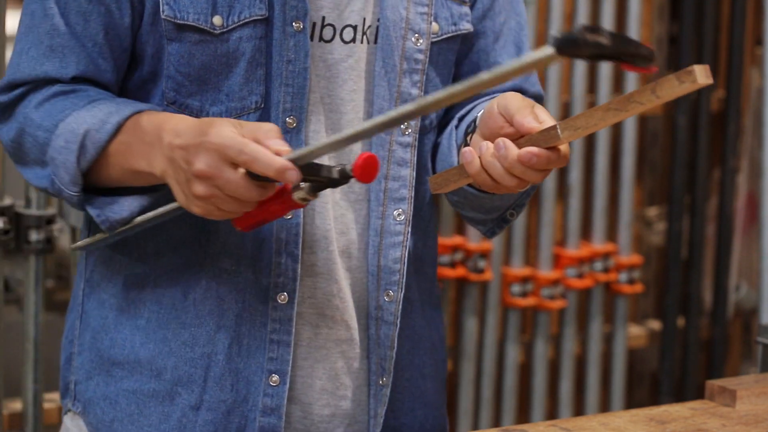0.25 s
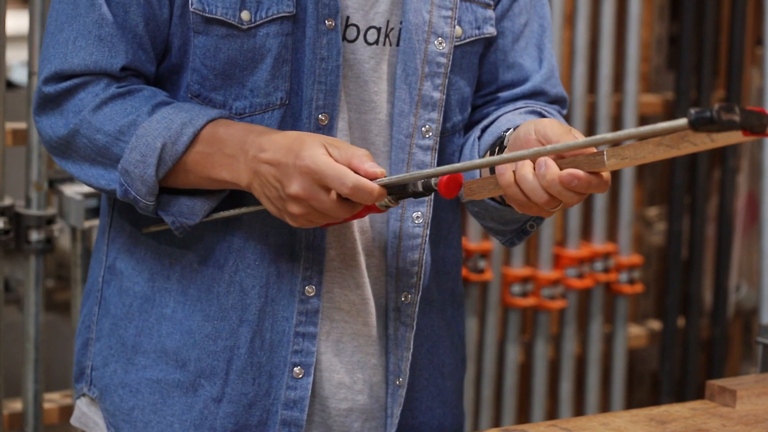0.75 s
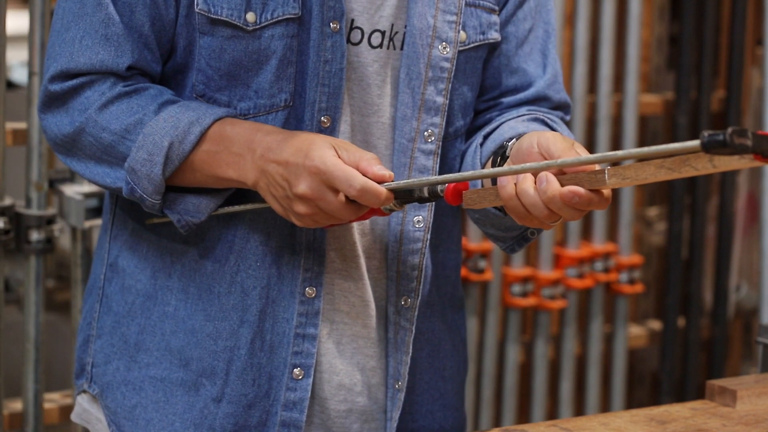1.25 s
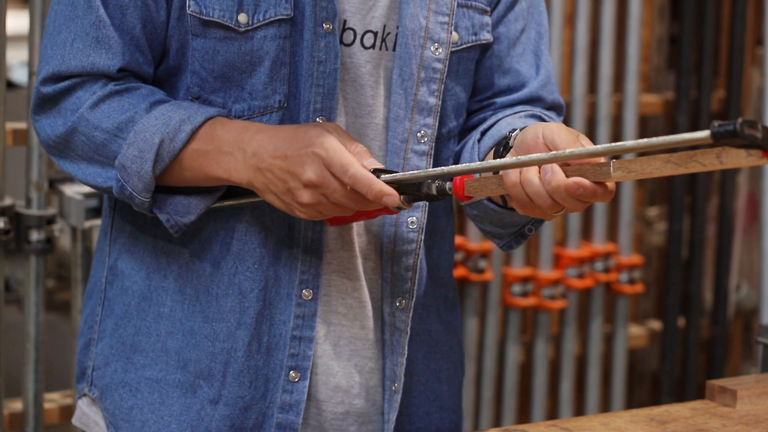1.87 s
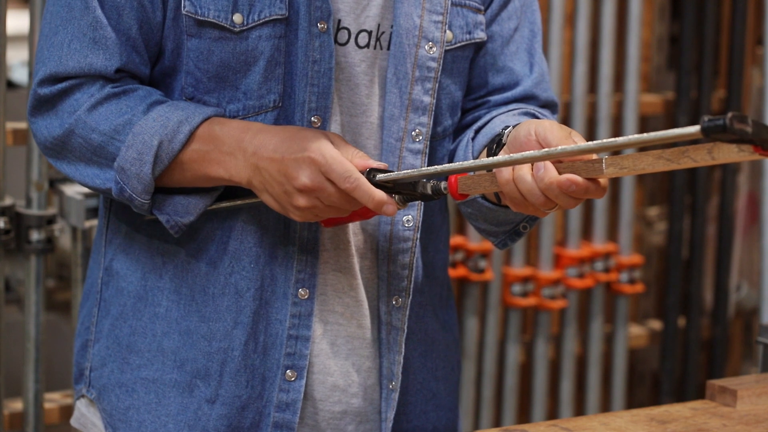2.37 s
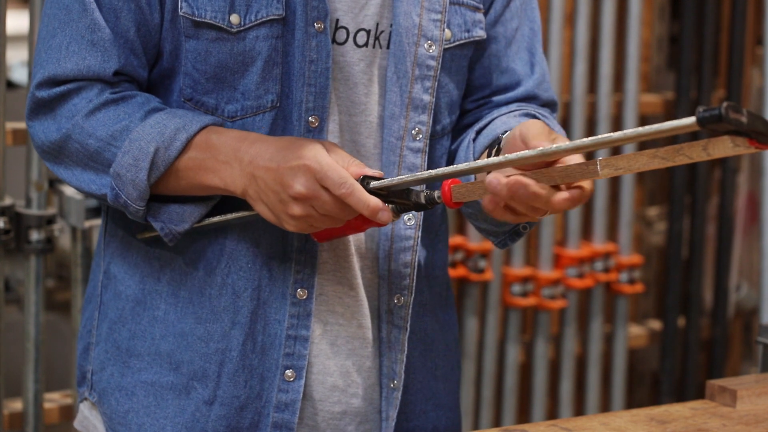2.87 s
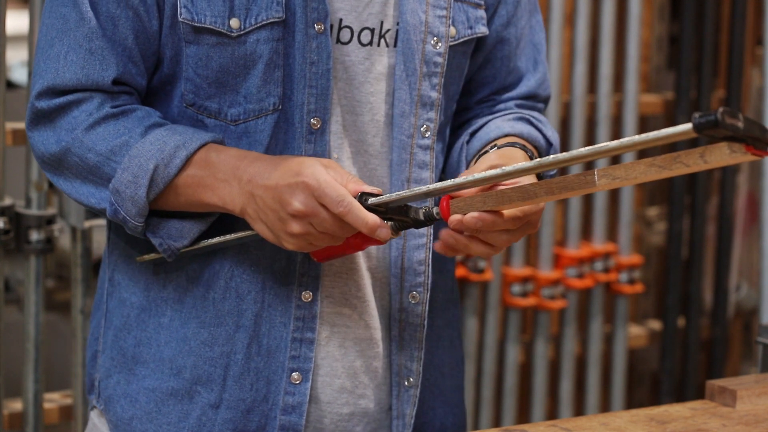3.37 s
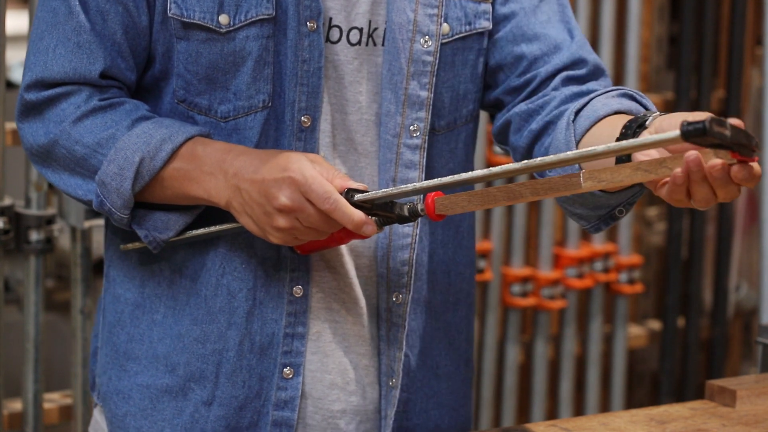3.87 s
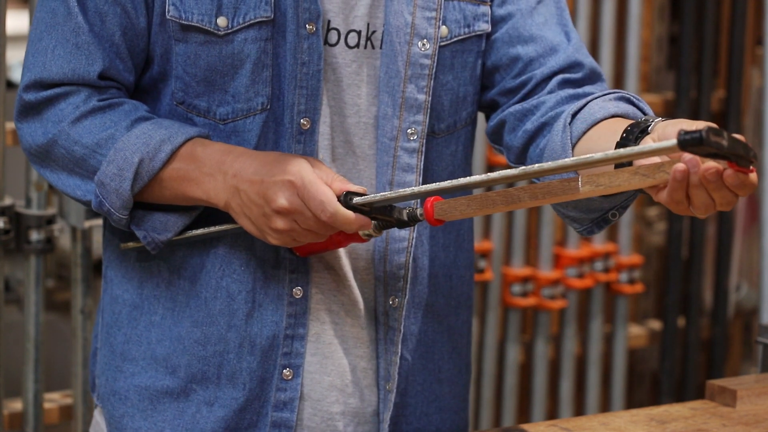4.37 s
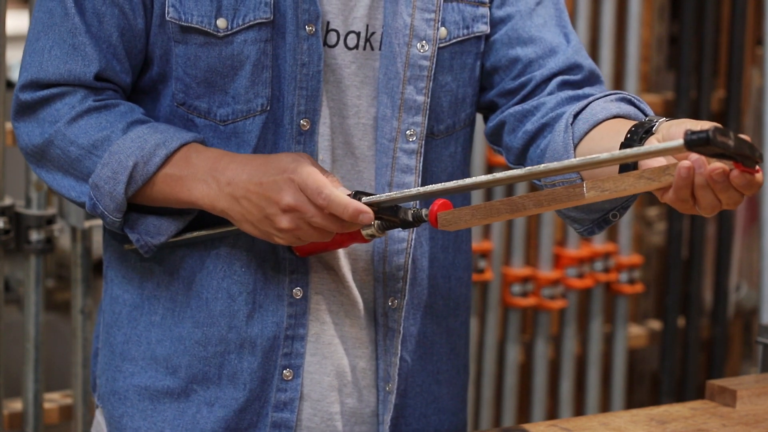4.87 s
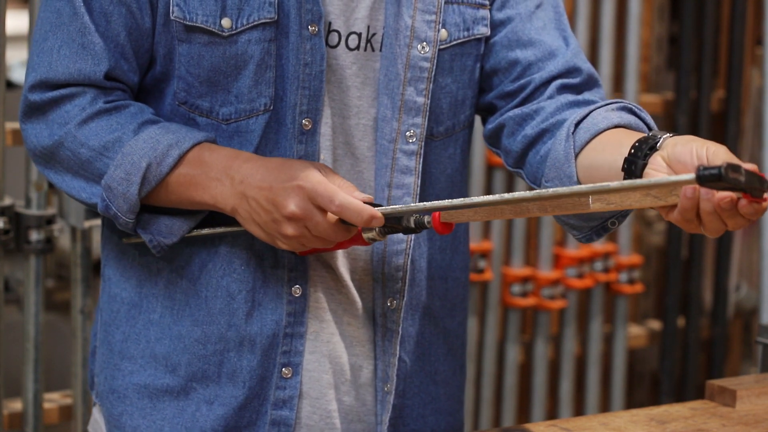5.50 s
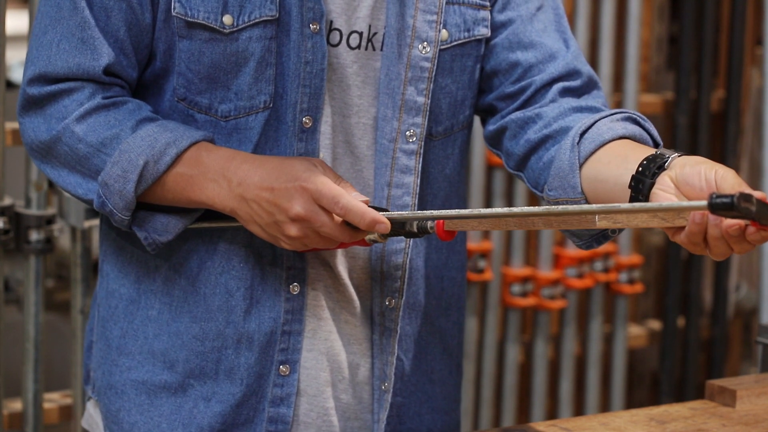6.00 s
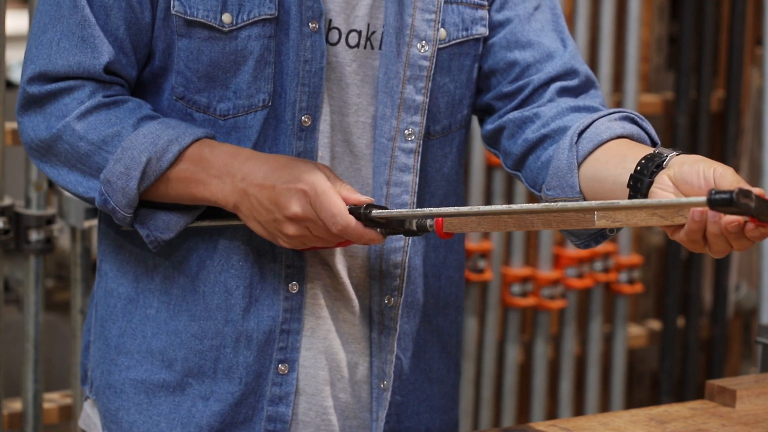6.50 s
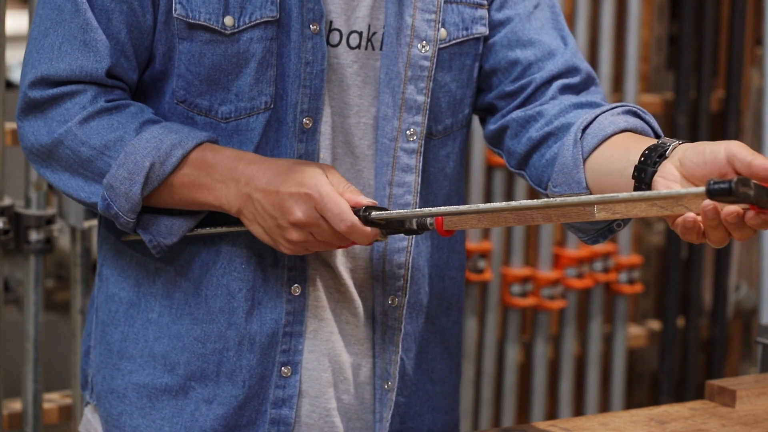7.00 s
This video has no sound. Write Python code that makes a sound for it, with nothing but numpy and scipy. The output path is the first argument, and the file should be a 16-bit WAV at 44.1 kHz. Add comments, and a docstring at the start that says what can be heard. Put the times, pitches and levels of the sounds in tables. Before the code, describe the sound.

Close metallic clicks and rattles of a steel bar clamp on wood, then farther, sharp echoing thuds at about four a second, like an air stapler.

```python
"""Bar clamp and air stapler in a workshop

A steel bar clamp is fitted to a strip of wood close by: contact noise clicks and taps, and decaying modes ring the bar.
Then sharp thuds, about four a second, come from further off, most likely an air stapler: echoes, bench modes and
filtered noise form each blow, and a noise puff its exhaust. Scrapes of work shifted on a bench are room-smeared noise.
A motor hums faintly underneath as wavering sines, over filtered noise for the still air and its hiss."""
import sys
import numpy as np
from scipy import signal
from scipy.fft import rfft, irfft, next_fast_len
from scipy.io import wavfile
from scipy.ndimage import uniform_filter1d, map_coordinates

SR = 44100
rng = np.random.default_rng(int(sys.argv[2]) if len(sys.argv) > 2 else 0)


def unload_audio(sound):
    """Save the sound as a 16-bit wav file, at the path given as the first command line argument."""
    columns = np.transpose(np.atleast_2d(sound))
    # keep every value between -1 and 1, then stretch to whole-number steps
    steps = np.round(np.clip(columns, -1, 1) * 32767)
    wavfile.write(sys.argv[1], SR, steps.astype(np.int16))


N = 319725

# spectrum of the escaping air: (frequency [Hz], relative level [dB])
EXHAUST_SPECTRUM = [(40, -56), (250, -20.5), (700, 4.5), (1500, -0.5), (2500, -1), (3600, 0.5), (4400, -3),
                    (5900, -1.5), (7200, -6.5), (9000, -9.5), (12500, -17.5), (15500, -26.5)]
# reverberation of the workshop: (frequency [Hz], time to decay by 60 dB [s])
ROOM_DECAY = [(100, 0.74), (300, 1), (700, 0.66), (1400, .74), (3000, 0.68), (5500, 0.56), (8000, 0.39),
              (11000, 0.35), (16000, 0.29)]


def amp(db):
    """Level to amplitude: 20 dB is a factor of ten."""
    return 10 ** (np.asarray(db) / 20)


def unit(x):
    """Normalisation to a root-mean-square value of one."""
    return x / np.sqrt(np.mean(x ** 2) + 1e-20)


def along(points, hz):
    """Linear interpolation of (frequency [Hz], value) points on a logarithmic frequency axis."""
    point_hz, value = np.transpose(points)
    return np.interp(np.log(hz + 1), np.log(point_hz + 1), value)


def bell(hz, centre_hz, slope_db):
    """Resonance-like weighting in dB: a hump falling with the square of the distance in octaves."""
    octaves = np.log2((hz + 100) / (centre_hz + 100))
    return -slope_db * octaves ** 2


def wobble(rate):
    """Band-limited random modulation: a smooth curve through normal random knots, rate of them a second."""
    knots = rng.standard_normal(int(N * rate / SR) + 4)
    return map_coordinates(knots, [np.arange(N) * rate / SR])


def filtered(x, response):
    """Linear filtering as a product of the spectrum with a zero-phase response(Hz)."""
    size = next_fast_len(N + SR // 2)
    spectrum = rfft(x, size) * response(np.fft.rfftfreq(size, 1 / SR))
    return irfft(spectrum, size)[..., :N]


def pulse(level, size=4096):
    """Minimum phase from a folded cepstrum: the causal pulse of energy 1 shaped by level(Hz) in dB."""
    cepstrum = irfft(np.log(amp(level(np.fft.rfftfreq(size, 1 / SR))) + 1e-6))
    cepstrum[1:size // 2] *= 2
    cepstrum[size // 2 + 1:] = 0
    shape = irfft(np.exp(rfft(cepstrum)))
    return shape / np.linalg.norm(shape)


def coloured(x, spectrum):
    """Convolution with a causal filter given as (frequency [Hz], relative level [dB]) points."""
    return signal.fftconvolve(x, pulse(lambda hz: along(spectrum, hz)))[:len(x)]


def add(track, s, sound):
    """Superposition: a sound is summed into the track from time s [s] on, cut at the track's ends."""
    start = round(s * SR)
    sound = sound[max(-start, 0):max(N - start, 0)]
    track[max(start, 0):][:len(sound)] += sound


def room(early_db, early_s):
    """Reverberation as decaying noise of energy 1: each band has its own decay, early sound is boosted."""
    hz, t, bands = signal.stft(rng.standard_normal(SR), SR, nperseg=256)
    bands = bands * amp(-60 * t / along(ROOM_DECAY, hz)[:, None])
    tail = signal.istft(bands, SR, nperseg=256)[1][:SR]
    tail *= 1 + amp(early_db) * np.exp(-(np.arange(SR) / SR / early_s) ** 2)
    return tail / np.linalg.norm(tail)


def diffuse(envelope):
    """Diffuse-field energy balance: a noise burst's power builds up and dies away band by band."""
    hz, t, bands = signal.stft(rng.standard_normal(SR), SR, nperseg=128)
    smooth_power = np.abs(uniform_filter1d(envelope ** 2, size=64))
    power = np.interp(t * SR, np.arange(len(envelope)), smooth_power, right=0)
    decay = amp(-60 * t / along(ROOM_DECAY, hz)[:, None]) ** 2
    decay /= decay.sum(axis=1, keepdims=True)
    held = signal.fftconvolve(power[None], decay, axes=1)[:, :len(t)]
    return signal.istft(bands * np.sqrt(np.abs(held)), SR, nperseg=128)[1][:SR]


def scrapes(level_db, grain_db):
    """Friction noise: wood rubs over the bench in uneven strokes that the room smears."""
    # work pushed over the bench: (time [s], length [s], relative level [dB])
    strokes = [(-.1, 0.1, -56.5), (2.618, 0.093, -40.5), (2.686, .24, -47.5), (3.419, 0.093, -39.5),
               (3.488, 0.23, -48), (4.81, 0.13, -42), (5.739, 0.12, -46.5), (7.164, .14, -64.5)]
    # spectrum of the rubbing: (frequency [Hz], relative level [dB])
    rub_spectrum = [(40, -59), (100, -29), (200, -7), (300, -4.5), (400, 2.5), (520, -2), (760, -4.5),
                    (1000, -2.5), (1400, -4.5), (2000, -7.5), (3500, -10.5), (6500, -17), (10000, -26.5),
                    (15500, -38)]
    fade_db = -11  # level change from start to end of a stroke
    out = np.zeros(N)
    for s, length, db in strokes:
        u = np.linspace(0, 1, max(round(length * SR), 2))
        grain = grain_db * wobble(132.0)[:len(u)]
        stroke = np.sqrt(np.abs(np.sin(np.pi * u))) * amp(fade_db * u + grain)
        add(out, s, amp(db + level_db) * coloured(diffuse(stroke), rub_spectrum))
    return out


def motor(hum_hz, hum_db, octave_db, shaft_hz, shaft_db):
    """Frequency and amplitude modulation: a hum and its octave swell and waver above a low shaft line."""
    # swelling of the motor hum: (time [s], relative level [dB])
    hum_levels = [(0.0, -96), (0.09, -74), (0.27, -83), (0.32, -71.5), (1.07, -70.5), (1.29, -78.5),
                  (1.58, -64.5), (1.75, -66), (1.88, -83), (1.94, -71), (2.39, -76.5), (2.6, -94)]
    t = np.arange(N) / SR
    phase = 2 * np.pi * np.cumsum(hum_hz + 1.07 * wobble(10)) / SR
    swell = amp(np.interp(t, *np.transpose(hum_levels), right=-90) + hum_db)
    hum = swell * (np.sin(phase) + amp(octave_db) * np.sin(2 * phase))
    shaft = amp(shaft_db + 0.5 * wobble(3)) * np.sin(2 * np.pi * shaft_hz * t)
    return hum + shaft


def air(room_db, hiss_db):
    """Stationary filtered noise: still air alike in both channels, and a faint hiss of opposite sign in each."""
    # spectrum of the still air: (frequency [Hz], relative level [dB])
    air_spectrum = [(15, -31), (25, -27), (71, 2), (160, -2.5), (227, -1), (297, -4), (445, -3),
                    (523, -8.5), (684, -8.5), (762, -8.5), (1340, -14), (2060, -17), (2420, -18.5),
                    (15500, -23.5)]
    # spectrum of the hiss: (frequency [Hz], relative level [dB])
    hiss_spectrum = [(15, -31), (25, -17), (55, 10), (260, -9.5), (648, -5.5), (1570, -16), (13500, -1.5),
                     (15500, -4.5)]

    def noise(spectrum):
        """Spectral shaping of white noise to unit power."""
        return unit(filtered(rng.standard_normal(N), lambda hz: amp(along(spectrum, hz))))

    hiss = amp(hiss_db) * noise(hiss_spectrum)
    return amp(room_db) * noise(air_spectrum) + np.array([hiss, -hiss])


def jaw(hz):
    """Resonant colouring of a contact in dB: the jaw's broad shape plus short resonances."""
    # broad shape: (frequency [Hz], relative level [dB])
    broad_shape = [(200, -35), (480, -14), (640, 2.5), (860, -15), (1200, 0.5), (1800, 0.5), (3800, 1),
                   (5800, 2.5), (8000, 2.5), (10500, -2), (13000, 3), (15500, -8)]
    # resonances of the jaw and the wood in it: (frequency [Hz], half-width [Hz], boost [dB])
    resonances = [(657, 42, 6.5), (1814, 81, 8), (2620, 43, 8.5), (3920, 130, 6.5), (5600, 410, 1.5),
                  (12700, 160, 1)]
    boost = sum(db / (1 + ((hz - centre) / width) ** 2) for centre, width, db in resonances)
    return along(broad_shape, hz) + boost


def contact(db, length, edge_hz, room_db, stop_s, grain_db):
    """Impact noise: two parts chatter for a few milliseconds, losing treble above an edge frequency."""
    t = np.arange(SR // 2) / SR
    touch = np.exp(-np.maximum(t - length, 0) / stop_s)
    grain = amp(grain_db * wobble(2504)[:len(t)])
    chatter = touch * unit(rng.standard_normal(len(t)) * grain)
    colour = pulse(lambda hz: jaw(hz) - 20 * np.log10(1 + (hz / edge_hz) ** 2))
    sound = chatter + amp(room_db) * diffuse(touch)[:len(t)]
    return amp(db) * signal.fftconvolve(sound, colour)[:len(t)]


def clamp(level_db, ring_db, ring_focus_db):
    """Modal excitation: jaw clicks ring the bar, one pitch setting both brightness and the modes favoured."""
    # jaw clicks on the bar: (time [s], relative level [dB], chatter before it dies away [s], pitch [Hz])
    clicks = [(0.502, -51, 0.0087, 1800), (0.5104, -43, .012, 2510), (.553, -59, .002, 5200),
              (.598, -53.5, 0.0079, 2800), (0.609, -49.5, 0.0036, 1800), (.6125, -45.5, 0.00089, 5600),
              (0.663, -58.5, .002, 2600), (0.931, -59, .001, 2760), (0.966, -55, .001, 7000),
              (1.838, -47.5, 0.0077, 3600), (1.855, -60, 0.0034, 3500), (1.878, -50.5, 0.004, 3300),
              (2.086, -49, .003, 4220), (2.101, -52, 0.0015, 4170), (2.102, -45.5, 0.0067, 5500),
              (4.889, -41.5, 0.0016, 7400)]
    # modes of the steel bar: (frequency [Hz], relative level [dB], time to decay by 60 dB [s])
    bar_modes = [(1670, 3, .3), (2760, -1.5, 0.36), (3240, 0, 0.25), (4070, 1, 0.28), (4200, 0, 0.4),
                 (5060, -1, 0.21), (5620, -1, 0.32), (5700, -12, 0.51), (6070, -4, 0.45), (7364, -17, 0.3)]
    edge_over_pitch = 2.3  # treble edge of a click over its pitch
    ring_grows = 0.59  # dB of ring per dB of click
    out, t = np.zeros(N), np.arange(SR // 2) / SR
    for s, db, length, pitch_hz in clicks:
        click = contact(db + level_db, length, edge_over_pitch * pitch_hz, room_db=-13, stop_s=0.0038, grain_db=4.0)
        ring = np.zeros(len(t))
        for hz, mode_db, t60 in bar_modes:
            blur = np.cumsum(rng.normal(0, 0.086, len(t)))  # the loose jaw rattles and blurs each mode
            decay = amp(mode_db + bell(hz, pitch_hz, ring_focus_db) - 60 * t / t60)
            ring += decay * np.sin(2 * np.pi * hz * t + blur)
        ring *= 1 - np.exp(-t / .002)
        add(out, s, click + amp(ring_db + ring_grows * db) * ring)
    return out


def taps(edge_hz):
    """Soft impact: the pad touches and scuffs the wood, dull and too soft to ring the bar."""
    # pad contacts: (time [s], relative level [dB], chatter before it dies away [s])
    touches = [(1.124, -61.5, .001), (1.1653, -70, .004), (1.219, -64.5, .001), (1.232, -73.5, .033),
               (2.346, -68, .006)]
    out = np.zeros(N)
    for s, db, length in touches:
        add(out, s, contact(db, length, edge_hz, room_db=-10, stop_s=0.0052, grain_db=3.5))
    return out


def shots():
    """Source strength scaling: a harder shot vents more air; yields time, thump, crack, exhaust dB, crack Hz."""
    # stapler shots: (time [s], relative strength [dB], crack over thump [dB])
    shot_list = [(3.051, -46, -6.5), (3.304, -41, 3), (3.555, -40.5, 2), (3.792, -38.5, 1),
                 (4.028, -38, -0.5), (4.369, -36, 0.5), (4.677, -35, 3), (4.932, -36, 2), (5.162, -39, 1),
                 (5.41, -37.5, 0), (5.656, -36, 0), (5.89, -38.5, 1.5), (6.11, -37, -10.5),
                 (6.334, -38.5, -7), (6.548, -39.5, -29.5)]
    # the spot that is struck: (time [s], crack pitch [Hz])
    crack_pitch = [(3.3, 1101), (5.9, 1050), (6.11, 564), (6.55, 990)]
    # mean relative exhaust level [dB], growth [dB per dB of strength], rise over the run [dB/s]
    vent_mean_db, vent_grows, vent_rise = -45.5, 0.87, 1.6
    s, db, crack_db = np.transpose(shot_list)
    vent_db = vent_mean_db + vent_grows * (db - db.mean()) + vent_rise * (s - s.mean())
    return zip(s, db, db + crack_db, vent_db, np.interp(s, *np.transpose(crack_pitch)))


def blows(thump_db, tail_db, crack_db, knock_db, snap_db, boom_db, boom_t60, boom_swell_s, crack_swell_s, focus_db):
    """Impulse response: nearly the same place is struck, so echoes and modes repeat while fine detail drifts."""
    # spectrum of the thump: (frequency [Hz], relative level [dB])
    thump_spectrum = [(55, -41.5), (90, -17.5), (130, -6), (250, 0), (430, -5.5), (560, -9), (900, -26),
                      (2000, -36), (15000, -60)]
    # spectrum of the crack: (frequency [Hz], relative level [dB])
    crack_spectrum = [(40, -51), (200, -39), (500, -10.5), (620, 0), (780, -11), (860, -9), (1050, 4),
                      (1400, -4), (1650, -3), (2000, -7), (4000, -10.5), (8000, -18), (15000, -68)]
    # the tool's nose on the wood: (frequency [Hz], relative level [dB])
    knock_spectrum = [(300, -18), (800, -11), (1050, 4), (1380, -38), (1800, -35), (4000, -39),
                      (12000, -51)]
    # modes of the bench and the room: (frequency [Hz], relative level [dB])
    boom_modes = [(116, -9), (141, -3), (176, -19), (189, -3.5), (210, -1.5), (240, -6), (253.5, 0.5),
                  (284.5, 2), (307, -2.5), (320, -1), (350, -0.5), (365, -0.5), (397, 0), (421.5, -1),
                  (454, -1), (565.5, -9.5), (683.5, -16), (782.5, -3.5), (901, -16), (1045, -9),
                  (1119, -16), (1165, -13), (1327.5, -8), (1381, -2.5), (1413.5, -12.5), (1502, -26)]
    # near walls return the thump: (delay [s], relative level [dB])
    wall_echoes = [(.004, -2.5), (.0085, 2.5), (.019, -4.5), (.033, 3), (.040, 0), (0.047, -6.5),
                   (.082, 1.5), (0.125, -22), (.146, -11)]
    out, t = np.zeros(N), np.arange(SR) / SR
    # neighbouring modes start in opposite senses, so the boom takes a moment to build
    boom = sum((-1) ** k * amp(db) * np.sin(2 * np.pi * hz * t) for k, (hz, db) in enumerate(boom_modes))
    boom *= amp(-60 * t / boom_t60) * (1 - np.exp(-t / boom_swell_s))
    delays = [round(delay * SR) for delay, _ in wall_echoes]
    echoes = np.bincount(delays, [amp(db) for _, db in wall_echoes], SR)
    path = room(early_db=-41, early_s=0.22)
    body = amp(boom_db) * boom / np.linalg.norm(boom) + amp(thump_db) * coloured(echoes, thump_spectrum)
    # later echoes are duller, so the knock fades out of them
    knock = amp(knock_db) * coloured(echoes * np.exp(-t / 0.021), knock_spectrum)
    # the valve pops open
    snap = amp(snap_db) * coloured(path, EXHAUST_SPECTRUM) * (1 - np.exp(-t / 0.0081))
    for s, low_db, mid_db, air_db, crack_hz in shots():
        scatter = path + .5 * room(early_db=-12, early_s=0.18)
        colour = pulse(lambda hz: along(crack_spectrum, hz) + bell(hz, crack_hz, focus_db))
        crack = amp(crack_db) * signal.fftconvolve(scatter, colour)[:SR]
        crack *= 1 - np.exp(-t / crack_swell_s)
        thump = body + amp(tail_db) * coloured(scatter, thump_spectrum)
        add(out, s, amp(low_db) * thump + amp(mid_db) * (knock + crack) + amp(air_db) * snap)
    return out


def exhaust(level_db, peak_s, rise_s, fall_s, direct_db):
    """Jet noise: air vents just after each blow as a short puff, by way of the walls and straight."""
    # crack pitch giving no tilt [Hz]; tilt [dB per octave] gained when the crack is an octave higher
    flat_hz, tilt_gain = 970, 3.5
    out, t = np.zeros(N), np.arange(SR // 8) / SR
    valve = np.exp(np.minimum((t - peak_s) / rise_s, (peak_s - t) / fall_s))
    for s, _, _, air_db, crack_hz in shots():
        tilt_db = tilt_gain * np.log2(crack_hz / flat_hz)  # a lower crack comes with a duller puff
        colour = pulse(lambda hz: along(EXHAUST_SPECTRUM, hz) + tilt_db * np.log2(hz + 1000))
        add(out, s, amp(air_db + level_db) * signal.fftconvolve(diffuse(valve), colour))
        puff = signal.fftconvolve(valve * rng.standard_normal(len(t)), colour)
        # the straight path keeps the most treble: differencing tilts it upward
        add(out, s + 0.0088, amp(air_db + direct_db) * np.diff(puff))
    return out


def scene():
    """Superposition of near and far sources: clamp close by, stapler and scrapes further off, drone and air."""
    stapler = blows(
        thump_db=14.5, tail_db=19.5, crack_db=20.0, knock_db=8, snap_db=25.5,
        boom_db=26.0, boom_t60=0.71, boom_swell_s=0.0057,
        crack_swell_s=.008,  # the crack builds while the staple seats
        focus_db=3.0)
    stapler = stapler + exhaust(level_db=6.0, peak_s=0.023, rise_s=0.013, fall_s=0.0092, direct_db=0)
    near = clamp(level_db=-3.5, ring_db=-39.5, ring_focus_db=90) + taps(edge_hz=1200)
    drone = motor(hum_hz=206.8, hum_db=2.5, octave_db=-18.0, shaft_hz=71.4, shaft_db=-82.5)
    return stapler + scrapes(level_db=1.0, grain_db=1.5) + near + drone + air(room_db=-70.5, hiss_db=-80)


def record(dry):
    """Ideal low-pass filtering: nothing passes from the band limit upward."""
    top_hz = 15800
    return filtered(dry, lambda hz: hz < top_hz)


dry = scene()
out = record(dry)
unload_audio(out)
```